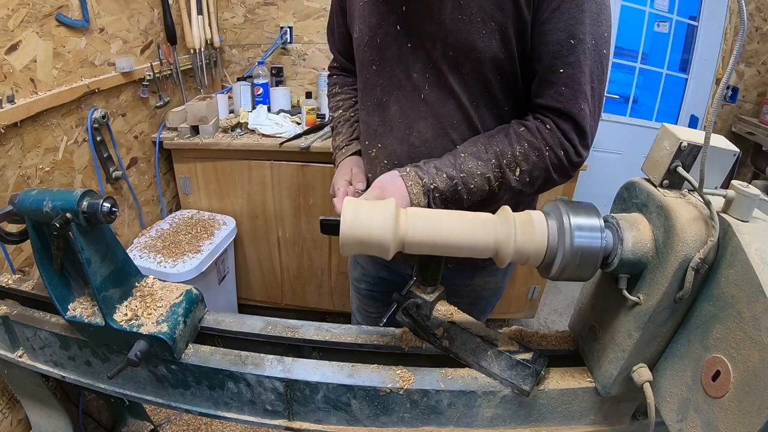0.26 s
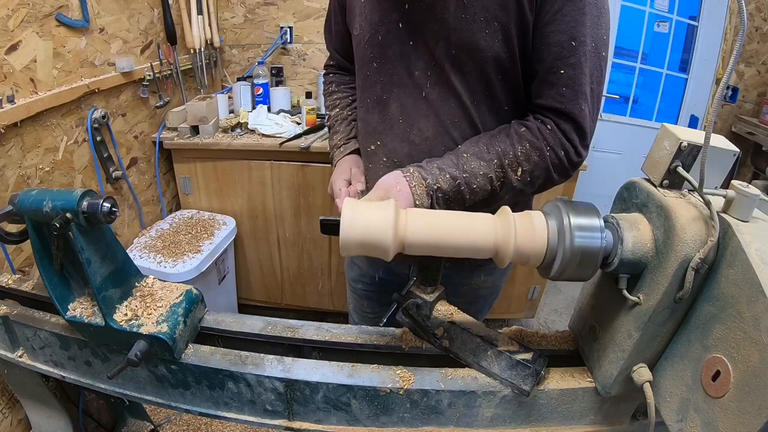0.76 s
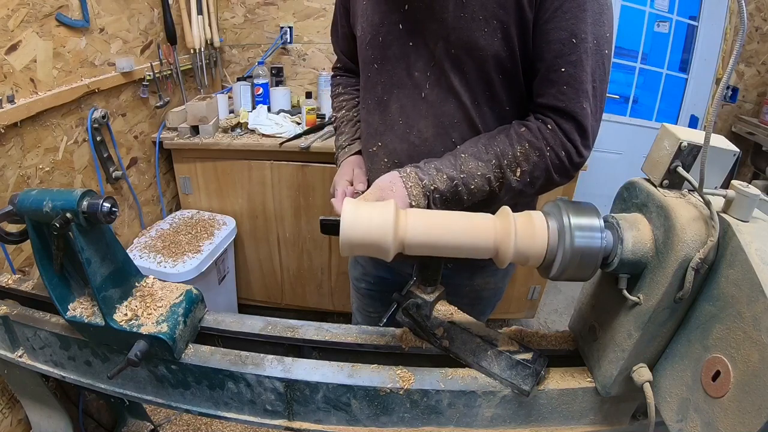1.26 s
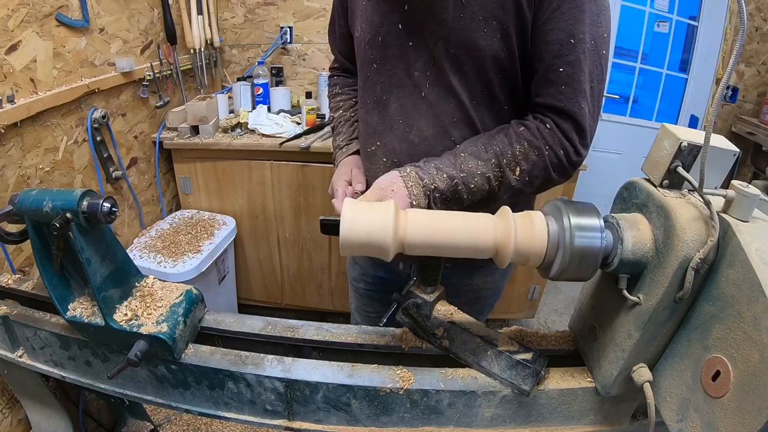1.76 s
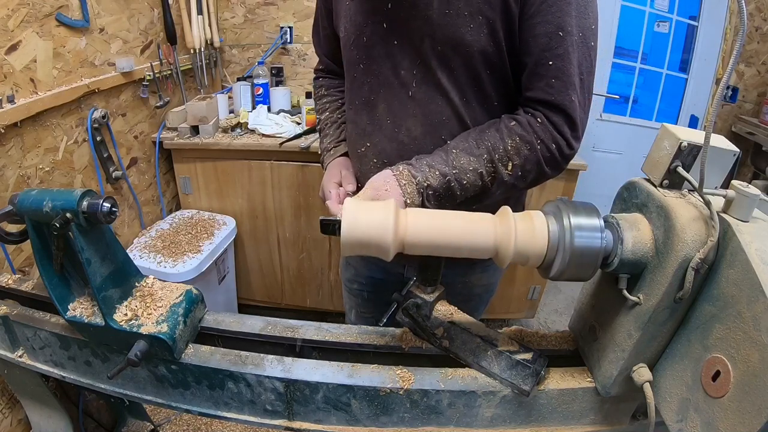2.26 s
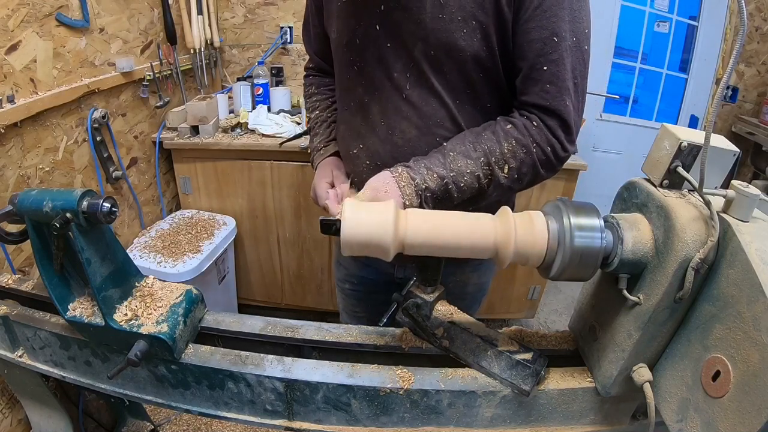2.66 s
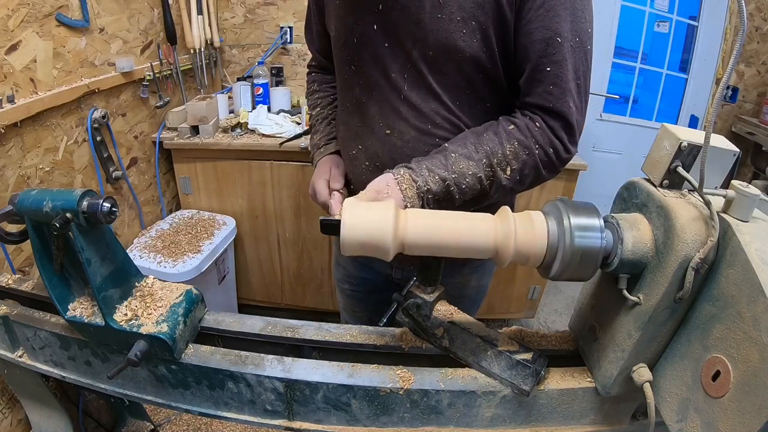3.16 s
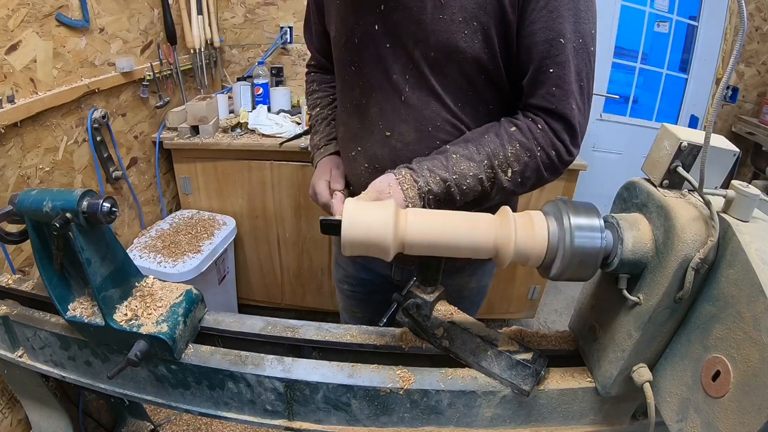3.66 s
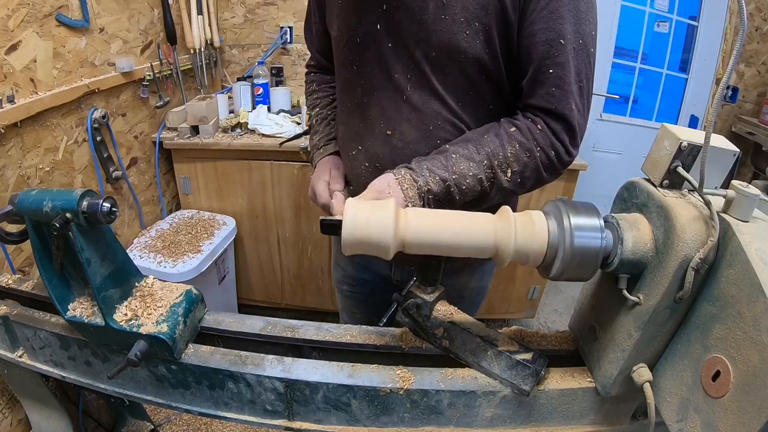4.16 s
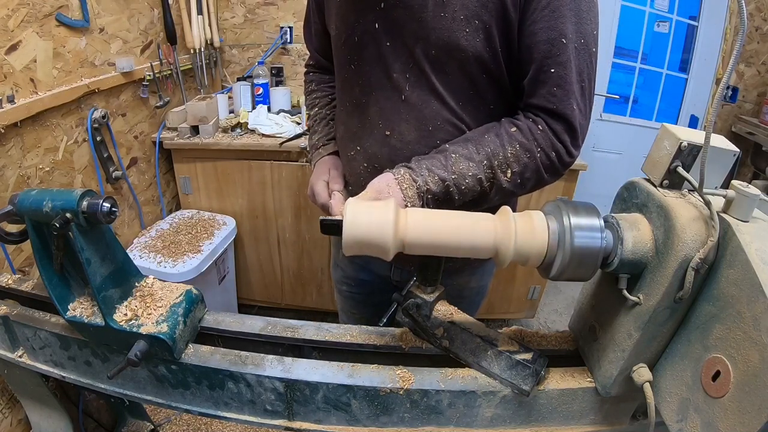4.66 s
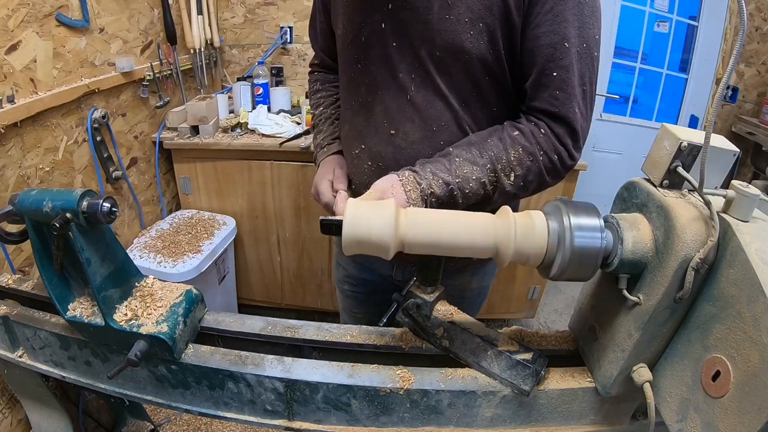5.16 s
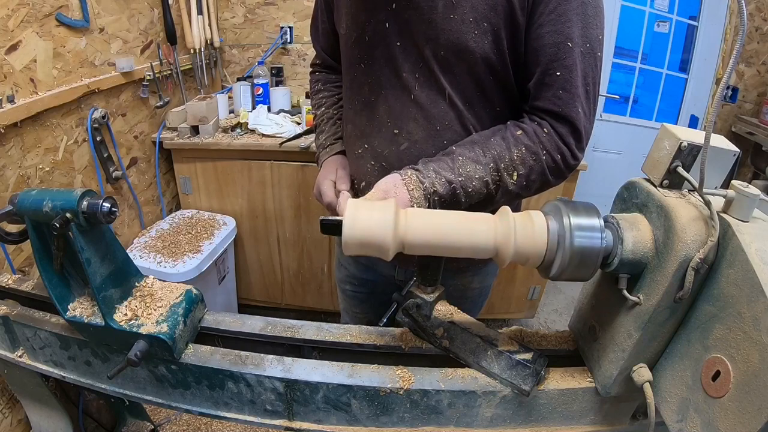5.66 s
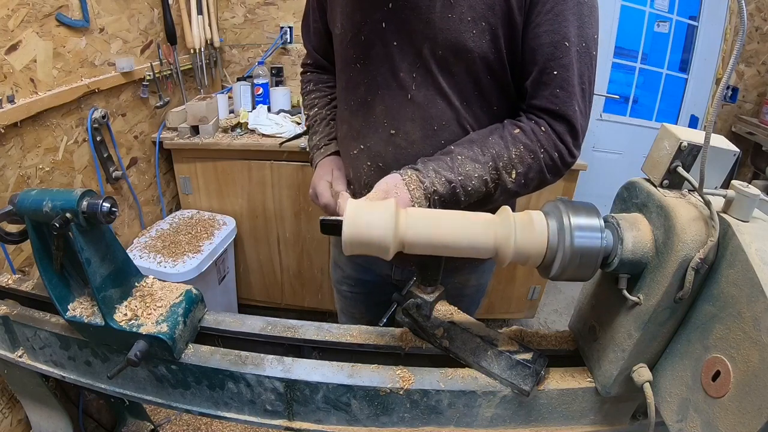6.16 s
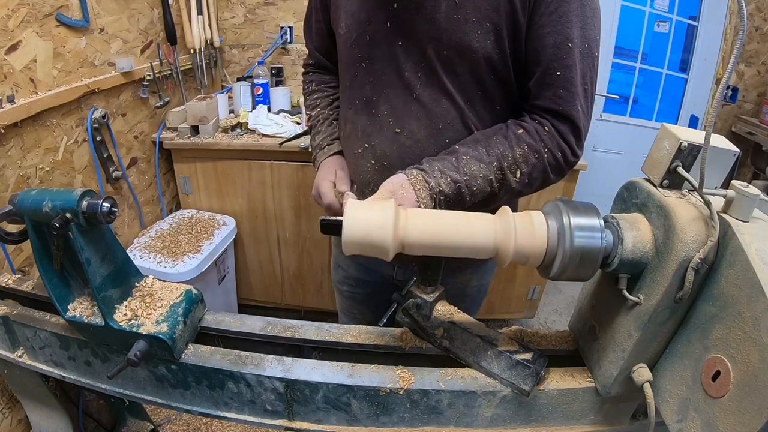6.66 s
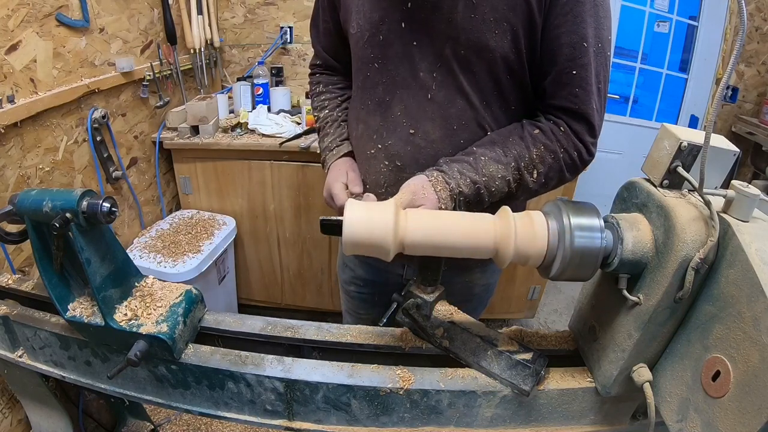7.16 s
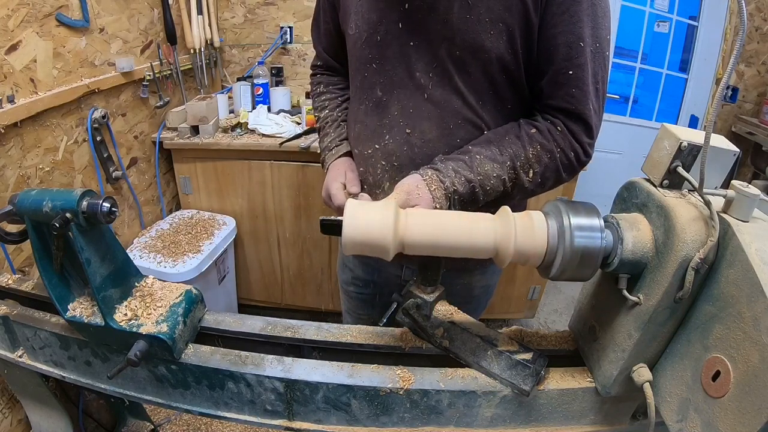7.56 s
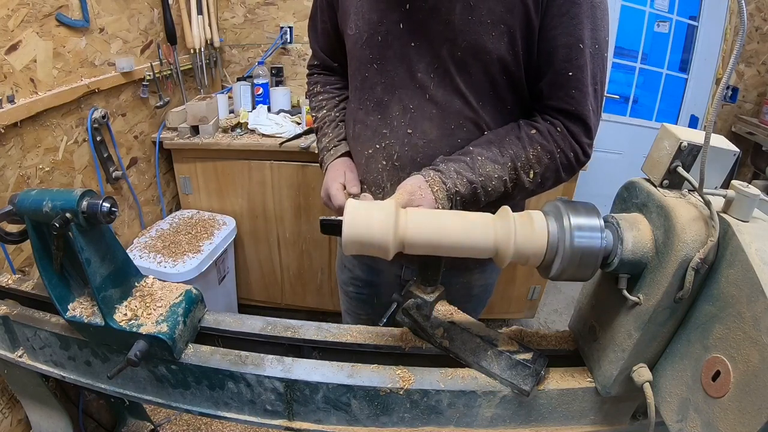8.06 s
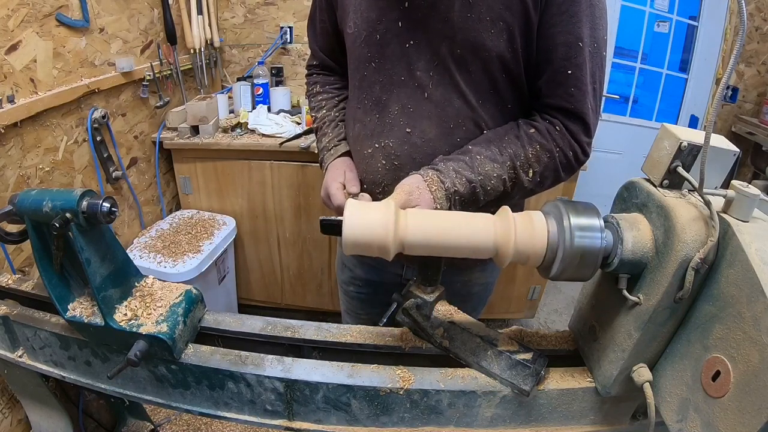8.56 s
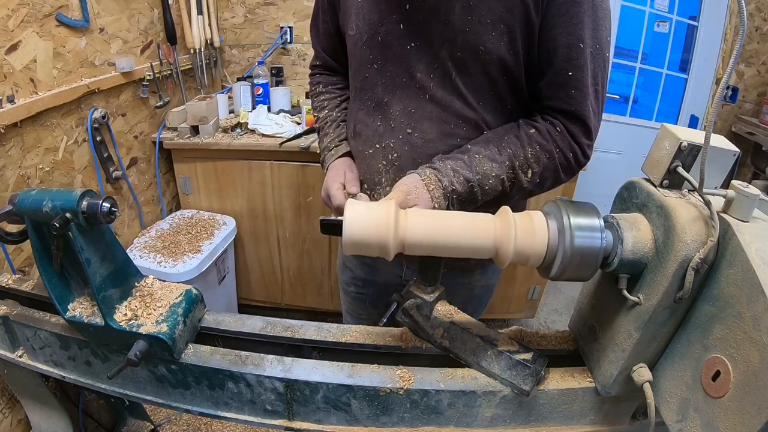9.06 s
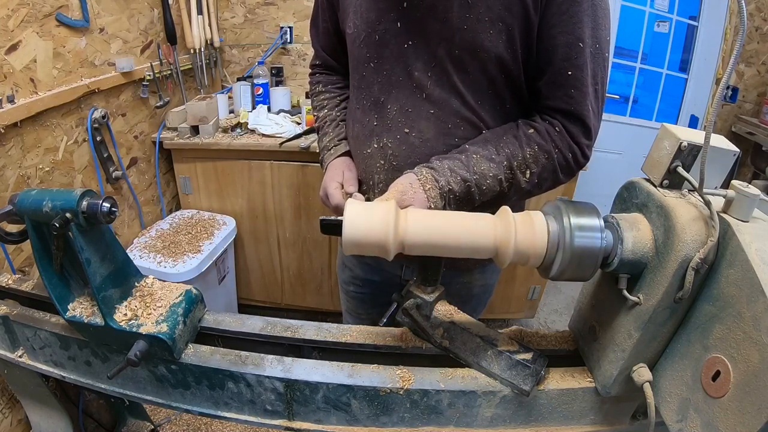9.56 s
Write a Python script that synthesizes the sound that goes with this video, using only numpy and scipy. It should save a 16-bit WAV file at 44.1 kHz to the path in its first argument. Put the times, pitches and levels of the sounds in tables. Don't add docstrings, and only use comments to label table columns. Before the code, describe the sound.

Close, dry sound of abrasive paper rubbing a fast-spinning wooden spindle on a lathe. Early strokes are light and hissy, with short gaps where the steady machine whine and rattle come forward. Pressure builds, a pitched chatter breaks out twice, a few quick slaps follow, and heavy growling rasps continue to the end in a small workshop.

```python
import sys
import numpy as np
from scipy import signal
from scipy.fft import rfft, irfft, next_fast_len
from scipy.io import wavfile
from scipy.ndimage import uniform_filter1d, map_coordinates

SR = 44100
rng = np.random.default_rng(int(sys.argv[2]) if len(sys.argv) > 2 else 0)


def wav_record(signal):
    frames = np.transpose(np.atleast_2d(signal))
    bounded = np.clip(frames, -1, 1)
    quanta = np.round(bounded * 32767).astype(np.int16)
    wavfile.write(sys.argv[1], SR, quanta)


def voltage_ratio(level):
    return 10 ** (np.asarray(level, float) / 20)


N = 432621
TURN_HZ = 64.245


def unit(x):
    return x / np.sqrt(np.mean(x ** 2) + 1e-20)


def curves(rows):
    s, *columns = np.transpose(rows)
    return [np.interp(np.arange(N) / SR, s, column) for column in columns]


def wobble(rate):
    knots = rng.standard_normal(int(N * rate / SR) + 4)
    return map_coordinates(knots, [np.arange(N) * rate / SR])


def crossfade(first, second, share):
    return np.sqrt(1 - share) * first + np.sqrt(share) * second


def filtered(x, response):
    m = next_fast_len(N + SR // 2)
    hz = np.fft.rfftfreq(m, 1 / SR)
    return unit(irfft(rfft(x, m) * response(hz), m)[:N])


def ringing(x, modes):
    ripple_db = 2.6 * rng.standard_normal(500)
    ripple_hz = np.linspace(0, SR / 2, len(ripple_db))

    def response(f):
        peaks = sum(voltage_ratio(2 * db) / (1 + (2 * (f - c) / w) ** 2) ** 1.47 for c, w, db in modes)
        ripple = voltage_ratio(np.interp(f, ripple_hz, ripple_db) * f / (f + 2500))
        bass_cut = f ** 2 / (f ** 2 + 260 ** 2)
        return np.sqrt(peaks) * ripple * bass_cut

    return filtered(x, response)


def tone(hz, unsteady_db, rate):
    phase = 2 * np.pi * (hz * np.arange(N) / SR + rng.random()) + 0.23 * wobble(rate)
    return np.sqrt(2) * voltage_ratio(unsteady_db * wobble(rate)) * np.sin(phase)


def repeating(memory, share, top_hz):
    def response(f):
        comb = np.sqrt(1 - memory ** 2) / (1 - memory * np.exp(-2j * np.pi * f / TURN_HZ))
        part = share / (1 + (f / top_hz) ** 4)
        return np.sqrt(1 - part + part * np.abs(comb) ** 2)

    return filtered(rng.standard_normal(N), response)


def spells(rows, rise_db_s, fall_db_s, floor_db):
    t, power = np.arange(N) / SR, voltage_ratio(2 * floor_db)
    reach = 60 / min(rise_db_s, fall_db_s)
    for start, end, first_db, last_db in rows:
        times = [start - reach, start, max(end, start + .005), end + reach]
        levels = [first_db - rise_db_s * reach, first_db, last_db, last_db - fall_db_s * reach]
        power = power + voltage_ratio(2 * np.interp(t, times, levels))
    return 10 * np.log10(power)


# pitch_hz, level_db
TONES = [(358.9, -42.8), (423.1, -62), (717.8, -52), (782.1, -57), (802.2, -47), (814.2, -52), (941.4, -55),
         (1005.7, -50), (1039.1, -60), (1069.9, -40.5), (1198.5, -53), (1339.9, -56), (1435.7, -56),
         (1518, -61), (1696.3, -47), (1705.5, -43.5), (1883.8, -49), (2407.3, -52)]
# multiple of the turn rate, level_db
IDLE = [(7, -59), (9, -43), (12, -39.5), (14, -59), (16, -62), (19, -54), (24, -59), (26, -57), (27, -50),
        (28, -56)]
# frequency_hz, density_db per Hz
ROAR = [(20, -29), (60, -20), (90, -26.5), (130, -12.5), (250, -2), (500, -1), (1200, 2), (2500, -2),
        (4000, -10.5), (6500, -14), (9500, -25), (12300, -35), (14500, -15), (16000, -25)]
# centre_hz, width_hz, level_db
CASTING = [(513, 9.9, -3), (615.6, 42, 3.5), (802, 36, -2), (984, 32, -5), (1166, 30, -0.5),
           (1613, 8.3, 1.5), (1755, 62, -3.5), (1887, 73, -9.5), (2680, 130, -23.5), (4414, 98, -18),
           (4600, 110, -15.5), (4800, 93, -14), (5230, 150, -22), (5657, 123, -16)]


def lathe():
    tones = sum(voltage_ratio(db) * tone(hz, unsteady_db=.8, rate=4) for hz, db in TONES)
    orders = sum(voltage_ratio(db) * tone(k * TURN_HZ, unsteady_db=1.5, rate=7) for k, db in IDLE)
    hz, db = np.transpose(ROAR)
    roar = filtered(rng.standard_normal(N), lambda f: voltage_ratio(np.interp(np.log(f + 1), np.log(hz), db)))
    rattle_db = 1.17 * wobble(60) + 1.3 * wobble(6)
    rattle = voltage_ratio(rattle_db) * repeating(memory=0.78, share=0.38, top_hz=4500)
    return tones + orders + voltage_ratio(-38.5) * roar + voltage_ratio(-34.0) * ringing(rattle, CASTING)


# start_s, peak level_db
SLAPS = [
    (7.1142, -19),
    (7.1297, -14),
    (7.1464, -15.5),
]


def slaps():
    t60_s = .035
    blows, t = np.zeros(N + SR), np.arange(SR // 30) / SR
    for s, db in SLAPS:
        blows[round(s * SR):][:len(t)] += voltage_ratio(db - 60 * t / t60_s) * rng.standard_normal(len(t))
    band = signal.butter(2, (500, 3200), "bandpass", fs=SR, output="sos")
    return signal.sosfilt(band, blows[:N])


# start_s, end_s, first level_db, last level_db
CHATTER = [
    (5.21, 5.54, -20.5, -19.5),
    (5.74, 6.33, -16, -23),
]


def chatter_db():
    return spells(CHATTER, rise_db_s=252, fall_db_s=220, floor_db=-70)


CHATTER_HZ = 629.3
# spindle orders away, level_db
WHIRL = [(-2, -13.5), (-1, -22), (0, 0), (1, -17.5), (2, -24)]


def chatter():
    note = sum(voltage_ratio(db) * tone(CHATTER_HZ + k * TURN_HZ, unsteady_db=1.6, rate=16) for k, db in WHIRL)
    return voltage_ratio(chatter_db()) * note


# time_s, share of the higher grit ring (0-1), share on the end face (0-1)
GRIP = [
    (0, .3, 0),
    (.4, 0, 0),
    (2.3, 0, 0),
    (2.7, .75, .2),
    (4, .8, .2),
    (5, 1, .2),
    (5.6, 1, .2),
    (6.4, 1, .8),
    (7.1, 1, 1),
    (9.81, 1, 1),
]
# start_s, end_s, first level_db, last level_db
TOUCHES = [(0.064, 0.098, -52.5, -48), (0.225, 1.05, -33, -31.5), (1.106, 1.186, -40, -41.5),
           (1.193, 1.258, -40.5, -31), (1.275, 1.382, -41, -42), (1.412, 1.597, -29.5, -32),
           (1.714, 1.867, -38.5, -34), (1.94, 2.407, -32.5, -35.5), (2.426, 2.504, -44, -45.0),
           (2.65, 2.729, -42.5, -26.5), (3.351, 3.499, -38, -37.5), (3.53, 3.59, -51, -52),
           (3.686, 3.907, -33.5, -30.5), (3.961, 3.998, -48.0, -50), (4.092, 4.328, -36, -33),
           (4.402, 4.508, -49, -47.5), (4.535, 4.748, -35.5, -33.5), (4.893, 5.298, -41.5, -23.5),
           (5.313, 5.637, -29.5, -34.5), (5.658, 5.823, -33.5, -27.5), (5.845, 6.605, -35, -29.5),
           (6.654, 7.021, -28.5, -29.5), (7.119, 7.722, -29, -29), (7.837, 8.409, -26, -31.0),
           (8.444, 8.593, -25.5, -35), (8.674, 8.771, -35.0, -39), (8.806, 9.142, -24, -27.5),
           (9.241, 9.442, -26, -26.5), (9.477, 9.63, -47, -22.5), (9.703, 9.837, -22, -28)]
# start_s, end_s, first level_db, last level_db
PUSHES = [(0.01, 0.17, -38, -55), (0.23, 0.4, -32.5, -26.5), (0.48, 1.04, -28.5, -24.5),
          (1.26, 1.27, -47, -23.5), (1.43, 1.58, -29, -28.5), (1.86, 1.87, -32, -44),
          (1.97, 2.27, -27, -27.0), (2.33, 2.42, -28.5, -34), (2.65, 2.75, -30, -21),
          (3.08, 3.19, -38.0, -33), (3.42, 3.52, -25.5, -40), (3.69, 3.89, -26, -22.5),
          (4.09, 4.19, -39, -20), (4.24, 4.33, -20.5, -26.0), (4.6, 4.69, -27.0, -23.5),
          (5.07, 5.28, -28.5, -16.5), (5.32, 5.56, -18.5, -22), (5.7, 6.03, -19.5, -19),
          (6.03, 6.36, -19.5, -20), (6.4, 6.6, -28, -23), (6.63, 6.9, -31.5, -21.5),
          (7.16, 7.18, -25, -23.5), (7.3, 7.69, -20.5, -27.0), (7.87, 8.0, -18.5, -26.5),
          (8.05, 8.33, -21, -22.5), (8.45, 8.57, -28.5, -41), (8.85, 8.94, -16.5, -20.5),
          (8.98, 9.1, -25, -18.5), (9.31, 9.63, -18, -34.5), (9.75, 9.8, -16, -19)]
# time_s, extra bite_db
DIGS = [(.27, 7), (.31, 2), (.35, 7), (.76, 6), (.885, 5.5), (1.04, 8), (1.85, 4), (2.1, 7), (2.21, 6),
        (2.738, 7), (2.76, 7.5), (3.69, 3), (4.19, 4.5), (4.31, 1), (5.3, -5), (6.36, -2), (6.56, 8),
        (6.86, 3), (7.13, 6), (7.155, 5), (7.49, 5), (7.88, -1), (8.07, 8.5), (8.22, 7), (8.47, 1),
        (9.3, 7), (9.62, 3), (9.765, 1.5)]
DIG_S = 0.018
DULLED_DB = -14.5


def hand():
    touch_db = spells(TOUCHES, rise_db_s=600, fall_db_s=400, floor_db=-59)
    push_db = spells(PUSHES, rise_db_s=293, fall_db_s=265, floor_db=-40.5)
    dig_db = sum(db * np.exp(-((np.arange(N) / SR - s) / DIG_S) ** 2) for s, db in DIGS)
    face = curves(GRIP)[1]
    worn = face ** 4
    skipping = np.clip(voltage_ratio(2 * (chatter_db() - push_db)), 0, 1)
    touch, push = touch_db + 33, push_db + 25
    fine_db = -45.5 + 0.7 * touch + 0.24 * push - 2.5 * face + 1.1 * dig_db - 5 * skipping
    rasp_db = -36 + 0.48 * touch + 0.3036 * push - 0.5 * face + 0.47 * dig_db - 5 * skipping
    hiss_db = touch_db + DULLED_DB * worn + 0.26 * dig_db
    hiss_db = 10 * np.log10(voltage_ratio(2 * hiss_db) + worn * voltage_ratio(2 * -53))
    return hiss_db, fine_db, rasp_db, push_db + 0.59 * dig_db


# time_s, high spot_db, its angle_turns, oval_db
CONTACT = [(0, 2, .77, .4), (.6, 6.8, .76, 1.3), (1.5, 4.8, .74, 1.6), (2.1, 1.5, .8, 1),
           (2.3, 3.5, .38, .2), (2.7, .8, .45, .2), (3.7, 2.2, .38, .2), (4.6, .4, .3, .5),
           (5.0, 2, .86, 1.5), (5.6, 2, .8, 2.7), (6.5, 5.9, .75, 1), (7.5, 4.2, .7, .9),
           (8.4, 2.6, .62, 1), (8.9, .8, .58, .3), (9.3, 4.4, .58, .4), (9.81, 2.5, .55, .4)]


def out_of_round(hiss_db, face):
    spot_db, spot, oval_db = curves(CONTACT)
    skim = np.clip((-36 + DULLED_DB * face ** 4 - hiss_db) / 6, 0, 1)
    spot_db = np.maximum(spot_db, 4.5 * skim)
    turns = TURN_HZ * np.arange(N) / SR
    throb_db = 1.29 * spot_db * np.cos(2 * np.pi * (turns + spot))
    throb_db = throb_db + 1.43 * oval_db * np.cos(2 * np.pi * (2 * turns + .08))
    throb_db = throb_db + 1.6 * np.cos(2 * np.pi * (4 * turns + 0.11))
    power = uniform_filter1d(voltage_ratio(2 * throb_db), size=round(2 * SR / TURN_HZ))
    throb_db = throb_db - 20 * np.log10(np.sqrt(np.abs(power)))
    tick_db = 0.3 * spot_db * np.cos(np.pi * (turns + spot)) ** 16
    return throb_db, tick_db


def grit(throb_db, coarse_db, noise):
    return voltage_ratio(throb_db + coarse_db * wobble(900) + 0.62 * wobble(45)) * noise


def patchy(x, depth_db):
    z = signal.stft(x, nperseg=512)[2]
    field = uniform_filter1d(rng.standard_normal(z.shape), size=6, axis=0)
    field = uniform_filter1d(field, size=24, axis=1)
    return signal.istft(z * voltage_ratio(depth_db * unit(field)), nperseg=512)[1][:N]


# centre_hz, width_hz, level_db
GRIT_LOW = [(8250, 250, -25), (10100, 500, -16), (11050, 320, -3.5), (12050, 370, 0), (12450, 200, -5)]
GRIT_HIGH = [(8300, 250, -25), (10300, 700, -18), (11400, 340, -4), (12330, 380, 0)]
GRIT_END = [(8600, 190, -31.5), (10100, 800, -11.5), (11550, 580, -8), (11980, 650, 0), (12900, 500, -0.5)]
# centre_hz, width_hz, level_db
FINE = [(13300, 400, -9), (14500, 590, 0), (15450, 500, -2)]
FINE_END = [(13000, 250, -6), (13500, 300, -7), (14200, 200, -6), (14570, 380, 0), (15250, 600, -5)]


def hissing(throb_db, grip, face):
    scratch = patchy(grit(throb_db, coarse_db=1.7, noise=rng.standard_normal(N)), depth_db=1.2)
    worn = face ** 4
    hiss = crossfade(ringing(scratch, GRIT_LOW), ringing(scratch, GRIT_HIGH), grip)
    hiss = crossfade(hiss, ringing(scratch, GRIT_END), worn)
    fine = crossfade(ringing(scratch, FINE), ringing(scratch, FINE_END), worn)
    return hiss, fine


# centre_hz, width_hz, level_db
WOOD = [(1165, 166, 4), (1650, 43, 7.5), (1780, 290, 5), (1950, 15, 4), (2278, 36, 6), (2530, 380, -1.5),
        (3890, 830, -7.5), (4670, 510, -7.5), (5340, 760, -6.5), (6580, 690, -11.5), (7370, 240, -13)]
END_FACE = [(1177, 64, 7.5), (1626, 75, 6.5), (1804, 120, 1), (1925, 28, 7), (2068, 130, 0),
            (2280, 100, 3.5), (2613, 330, -6), (3570, 1600, -9.5), (4400, 210, -18.5), (5200, 500, -4.5),
            (6420, 1200, -16), (7570, 450, -13), (8080, 86, -16)]


def rasping(throb_db, tick_db, face):
    noise = repeating(memory=0.925, share=0.56, top_hz=4570)
    tearing = patchy(grit(.5 * throb_db + tick_db, coarse_db=2.0, noise=noise), depth_db=1.7)
    return crossfade(ringing(tearing, WOOD), ringing(tearing, END_FACE), face)


# centre_hz, width_hz, level_db
BENDING = [(505, 16, -19), (604, 16, -24), (617, 24, -4.5), (622.7, 37, -10), (720, 33, -22)]
BENDING_END = [(513, 7.2, -8.5), (520, 5.5, -17), (612.3, 7.2, 0.5), (618.4, 22, 4), (696, 170, -22)]
# multiple of the turn rate, rim_db and end_face_db relative to the bending
PUSHED = [(7.75, -33.5, -15.5), (9.04, -39, -12), (10.03, -1.5, -6.5), (10.76, -17, -17),
          (25.26, -18.5, -26), (26.7, -22.5, -19), (30, -21, -47), (35.95, -20, -34.5), (41.47, -24.5, -26)]


def bending(bend_db, face):
    shaking = rng.standard_normal(N)
    bend = crossfade(ringing(shaking, BENDING), ringing(shaking, BENDING_END), face)
    bend = bend / np.abs(uniform_filter1d(bend ** 2, size=SR // 10)) ** 0.31
    calm = np.sqrt(np.clip(1 - voltage_ratio(2 * (chatter_db() - bend_db)), .1, 1))
    pushed = sum(voltage_ratio(rim_db + face * (end_db - rim_db)) * tone(k * TURN_HZ, unsteady_db=3.5, rate=9)
                 for k, rim_db, end_db in PUSHED)
    return calm * (unit(bend) + pushed)


def sanding():
    hiss_db, fine_db, rasp_db, bend_db = hand()
    grip, face = curves(GRIP)
    throb_db, tick_db = out_of_round(hiss_db, face)
    hiss, fine = hissing(throb_db, grip, face)
    rasp = rasping(throb_db, tick_db, face)
    growl = bending(bend_db, face)
    return voltage_ratio(hiss_db) * hiss + voltage_ratio(fine_db) * fine + voltage_ratio(rasp_db + 0.5) * rasp + voltage_ratio(bend_db - 1.65) * growl


def scene():
    paper = sanding() + chatter() + slaps()
    loud_db = 10 * np.log10(np.abs(uniform_filter1d(paper ** 2, size=SR // 4)) + 1e-9)
    duck_db = -.55 * np.clip(loud_db + 27, 0, 30)
    return (paper + voltage_ratio(duck_db) * lathe())[None]


def roll_off(x):
    return signal.sosfilt(signal.butter(12, 15960, fs=SR, output="sos"), x)


def record(dry):
    soft = dry / (1 + np.abs(dry / .52) ** 5) ** (1 / 5)
    limited = irfft(rfft(soft) * (np.fft.rfftfreq(N, 1 / SR) < 15760), N)
    return roll_off(limited)


dry = scene()
out = record(dry)
wav_record(out)
```